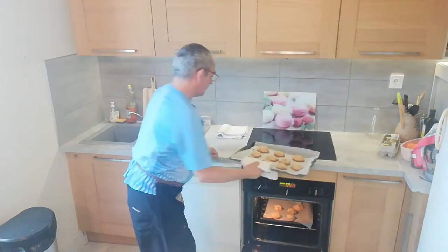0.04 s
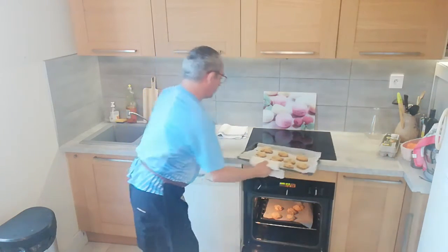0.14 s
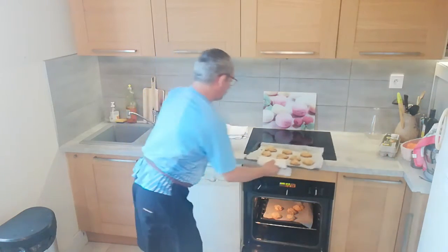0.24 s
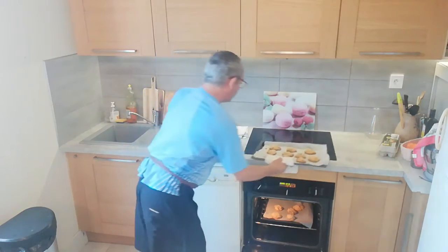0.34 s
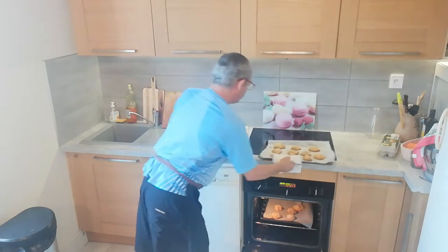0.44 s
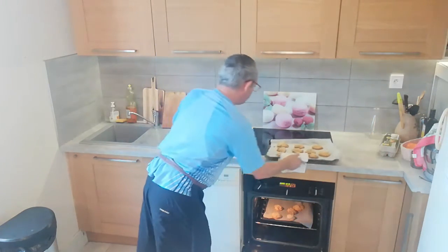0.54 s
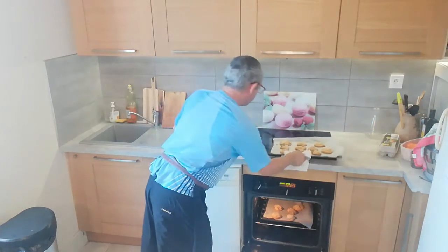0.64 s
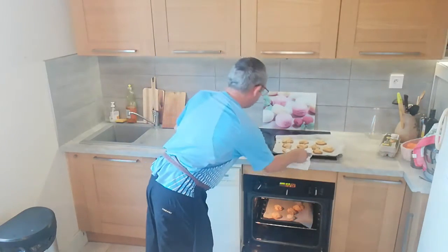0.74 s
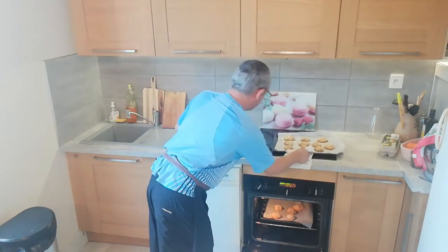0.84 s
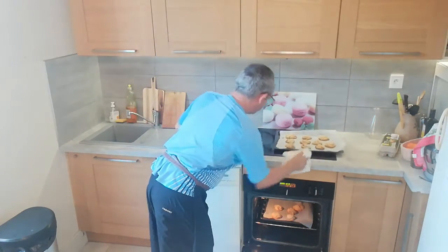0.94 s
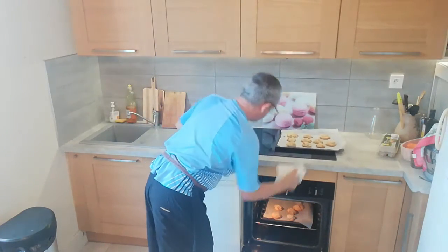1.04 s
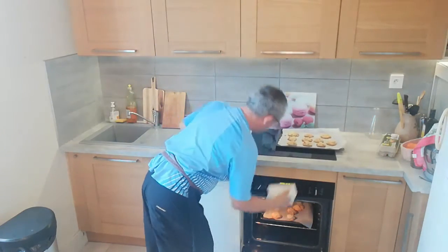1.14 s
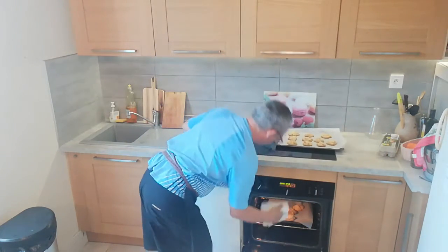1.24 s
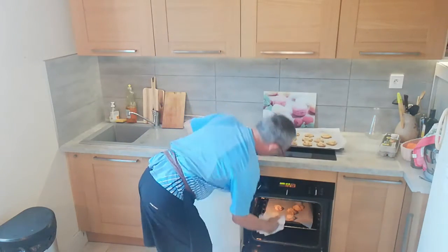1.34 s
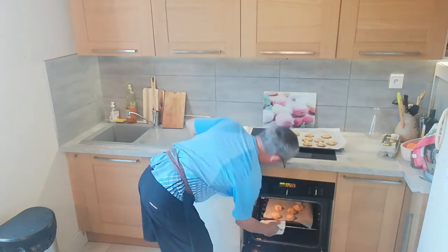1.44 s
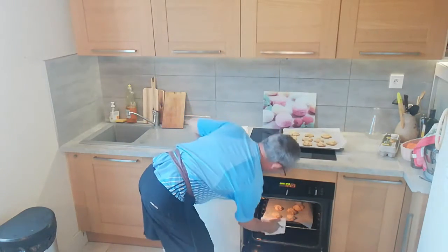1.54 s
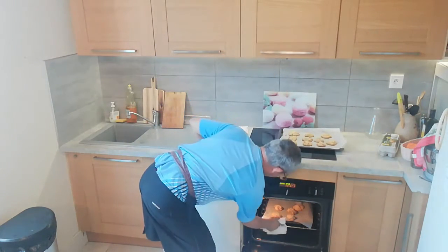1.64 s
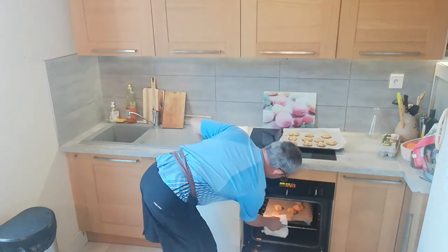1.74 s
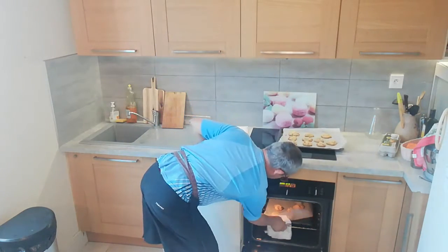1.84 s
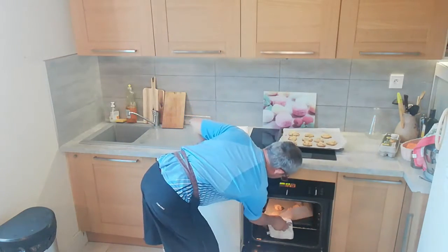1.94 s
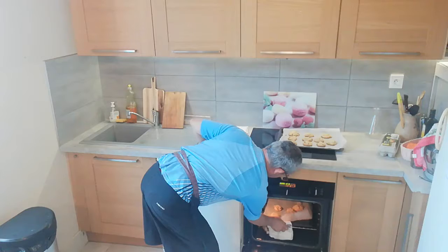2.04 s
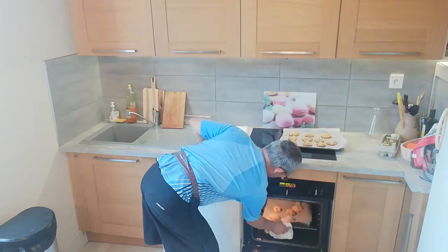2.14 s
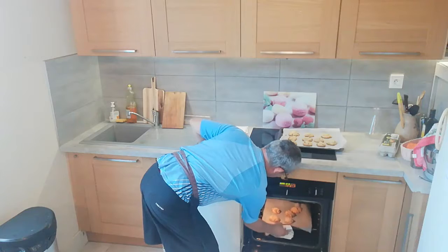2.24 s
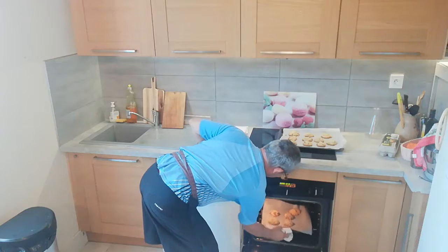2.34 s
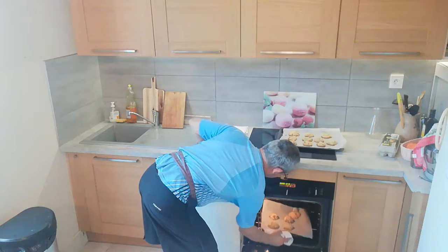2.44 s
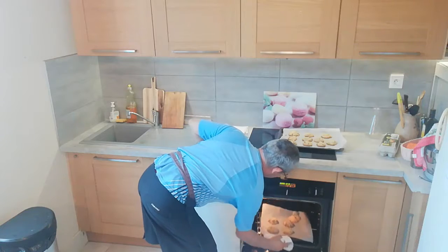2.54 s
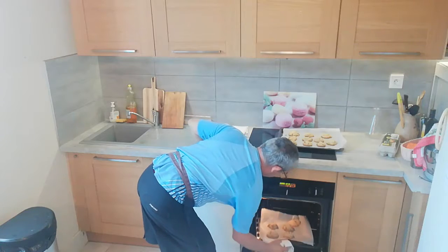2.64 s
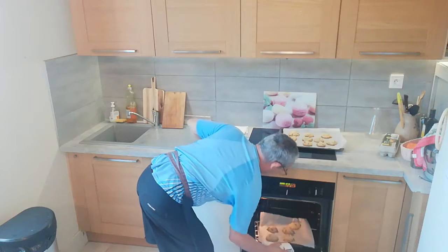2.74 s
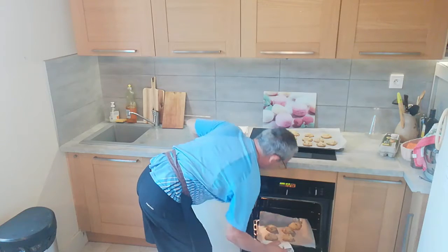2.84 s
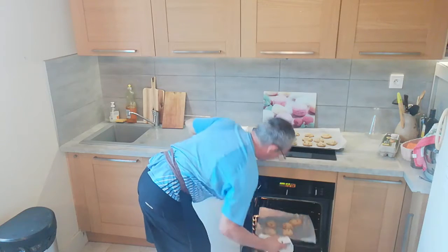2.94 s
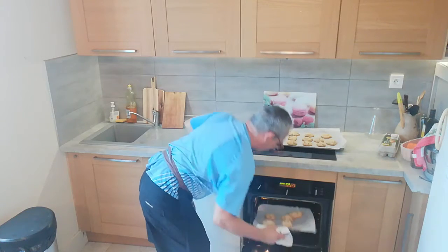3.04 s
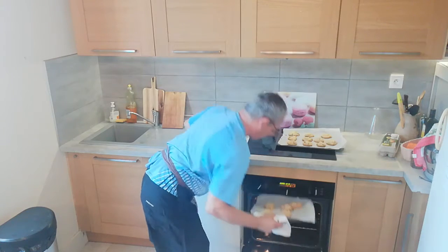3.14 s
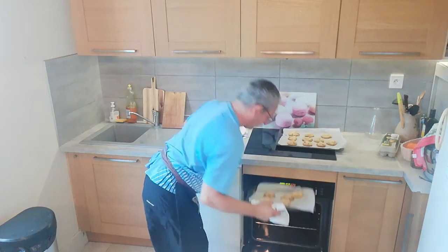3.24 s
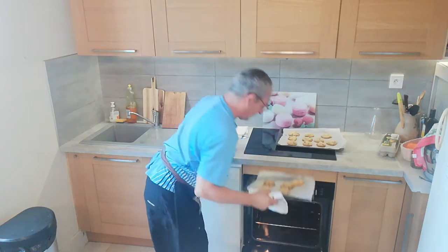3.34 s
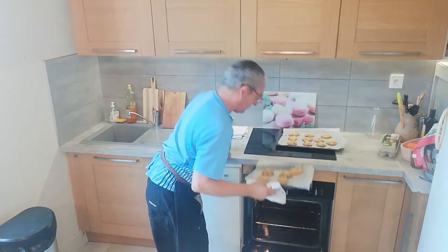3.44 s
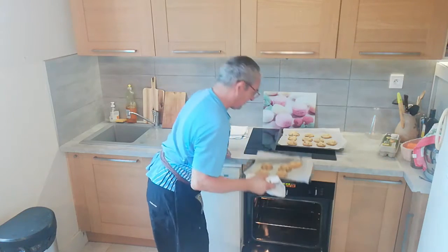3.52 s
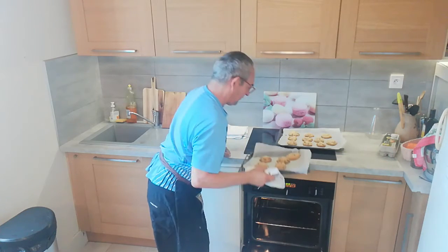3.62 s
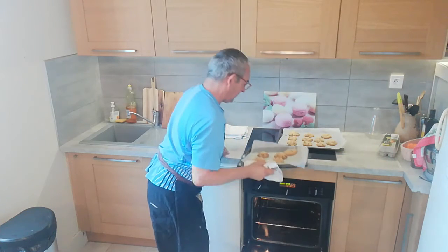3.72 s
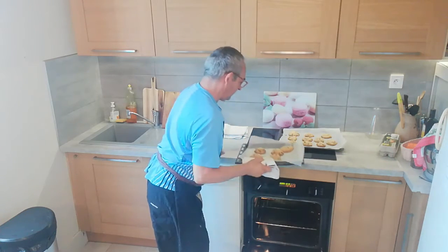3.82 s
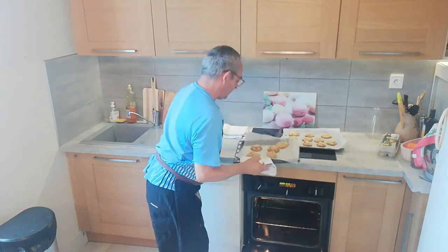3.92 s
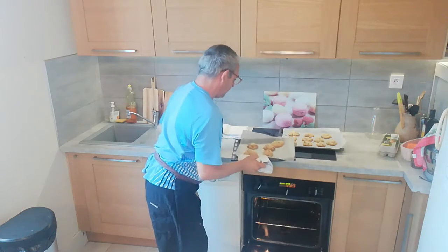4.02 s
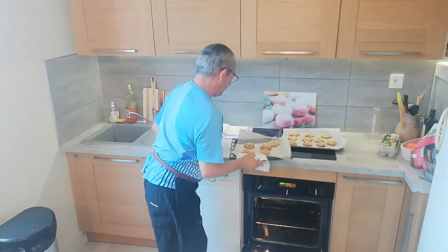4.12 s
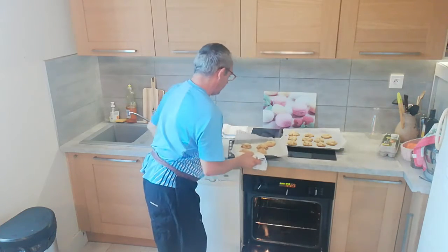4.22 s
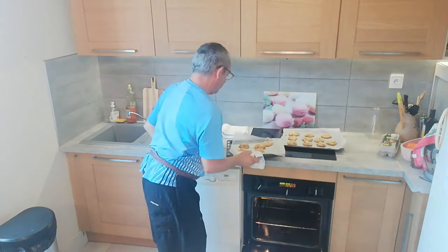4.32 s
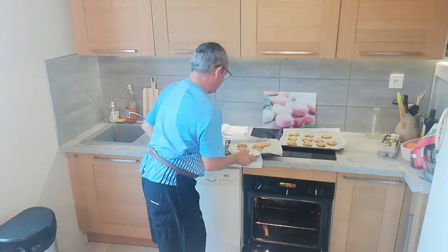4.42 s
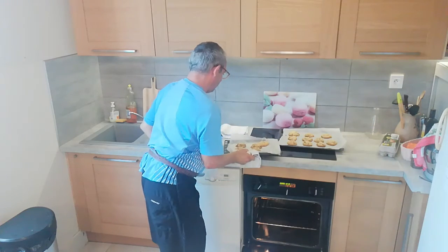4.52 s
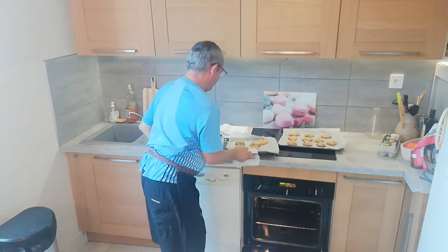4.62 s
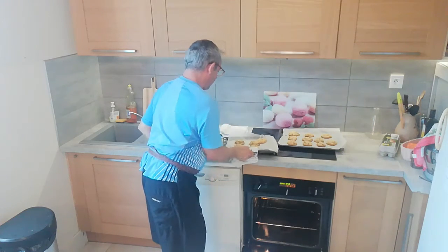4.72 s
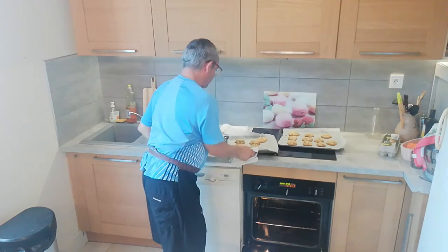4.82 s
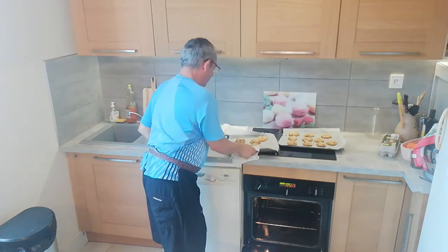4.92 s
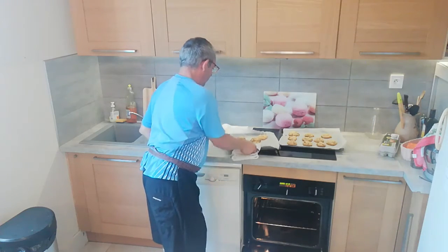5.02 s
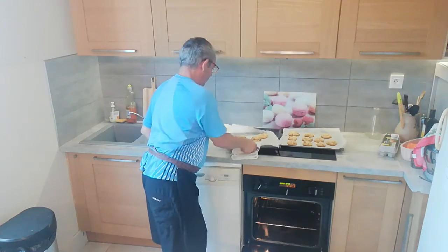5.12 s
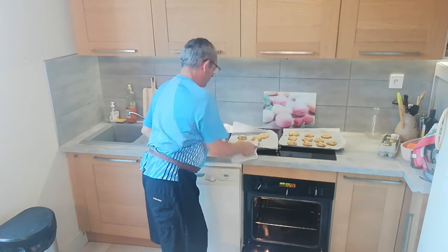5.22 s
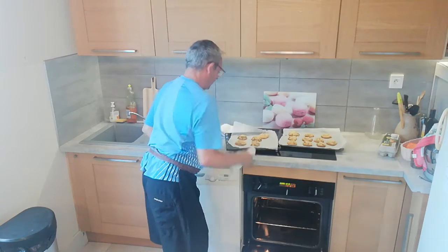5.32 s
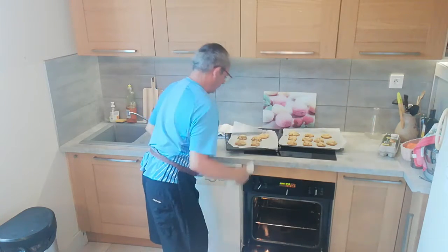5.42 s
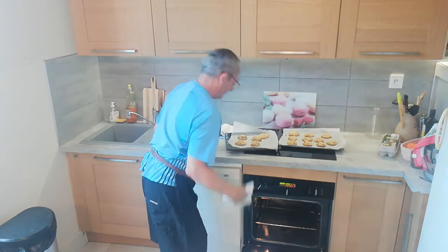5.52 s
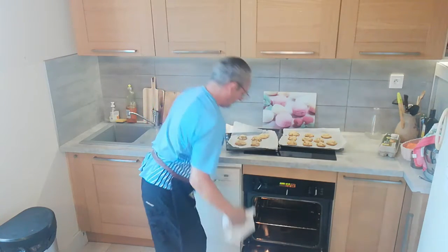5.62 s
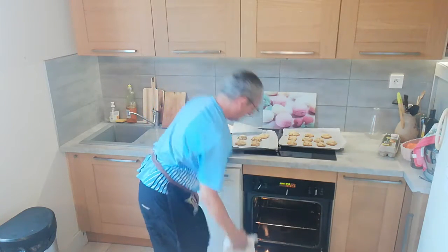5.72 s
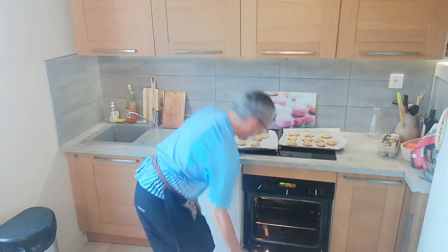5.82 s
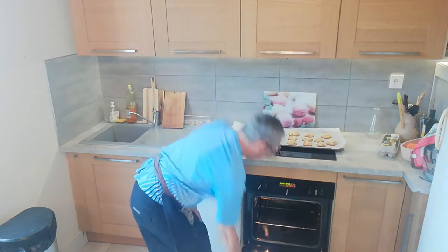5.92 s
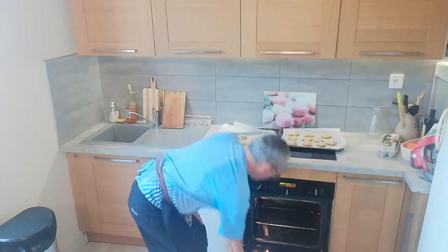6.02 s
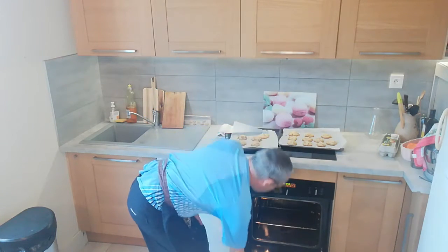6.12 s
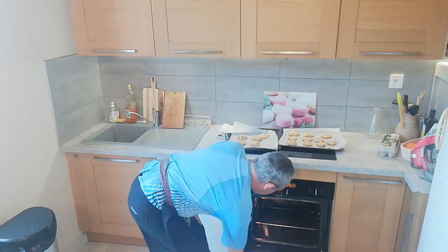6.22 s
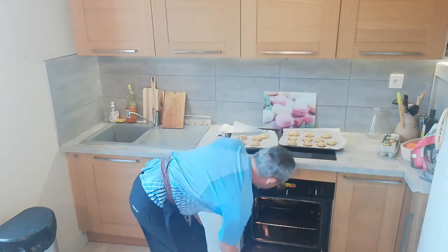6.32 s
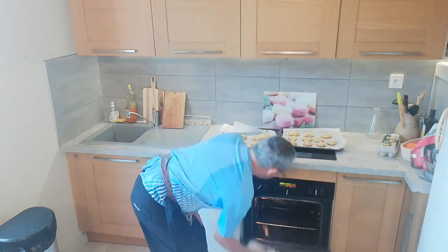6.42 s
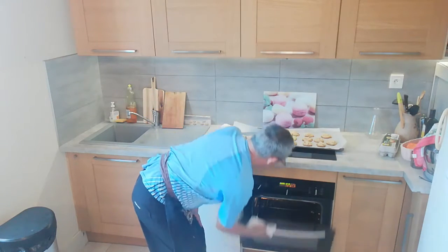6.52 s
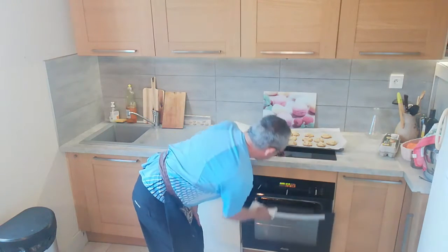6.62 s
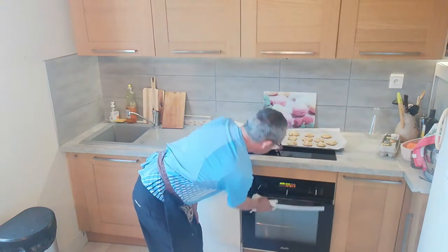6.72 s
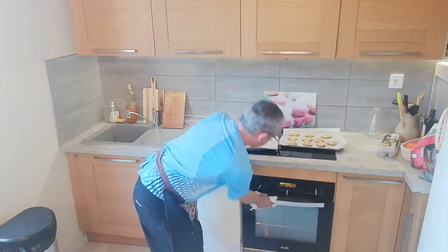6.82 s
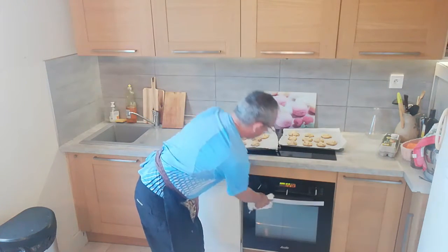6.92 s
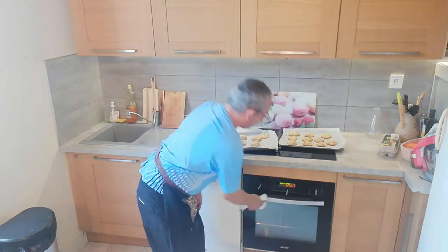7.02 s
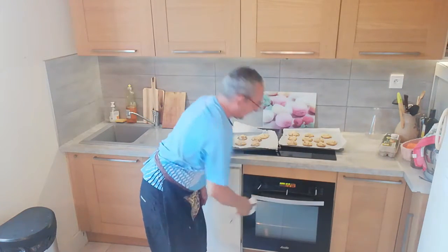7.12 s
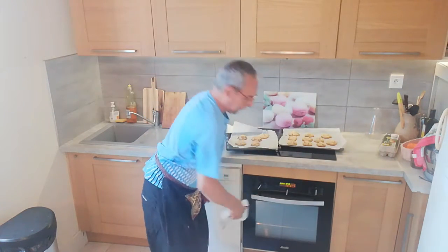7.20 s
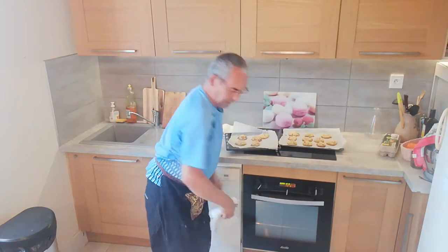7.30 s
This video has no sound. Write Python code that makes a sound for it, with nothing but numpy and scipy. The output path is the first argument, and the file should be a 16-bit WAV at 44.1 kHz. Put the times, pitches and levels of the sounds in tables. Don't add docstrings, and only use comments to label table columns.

```python
import sys
import numpy as np
from scipy import signal
from scipy.fft import rfft, irfft, next_fast_len
from scipy.io import wavfile

SR = 44100
rng = np.random.default_rng(int(sys.argv[2]) if len(sys.argv) > 2 else 0)


def natural_amplitude(level_db):
    exponent = np.asarray(level_db, float) / 20
    return 10 ** exponent


def digitize_waveform(pressure):
    field = np.atleast_2d(pressure).T
    bounded = np.clip(field, -1, 1)
    quanta = np.round(bounded * 32767).astype(np.int16)
    wavfile.write(sys.argv[1], SR, quanta)


N = 324576


def at_hz(points, hz):
    table_hz, value = np.transpose(points)
    return np.interp(np.log(hz + 1), np.log(table_hz + 1), value)


def rms_one(x):
    return x / np.sqrt(np.mean(x ** 2) + 1e-20)


def coloured(x, spectrum):
    hz = np.arange(x.shape[-1] // 2 + 1) * SR / x.shape[-1]
    return rms_one(irfft(rfft(x) * natural_amplitude(at_hz(spectrum, hz)), x.shape[-1]))


def diffuse(size, likeness):
    hz = np.arange(size // 2 + 1) * SR / size
    mid, side = rfft(rng.standard_normal((2, size)))
    alike = np.clip(at_hz(likeness, hz), -1, 1)
    left_right = np.sqrt(1 + alike) * mid + np.sqrt(1 - alike) * side * [[1], [-1]]
    return hz, left_right / np.sqrt(2)


def drift(rate_hz):
    steps = rng.standard_normal(2000)
    return np.interp(np.arange(N) / SR * rate_hz, np.arange(2000), steps) * 1.22


def resonator(hz, radius):
    return [1, -2 * radius * np.cos(2 * np.pi * hz / SR), radius * radius]


def ring(x, hz, t60):
    return signal.lfilter([0, np.sin(2 * np.pi * hz / SR)], resonator(hz, natural_amplitude(-60 / (t60 * SR))), x + 1e-18)


def struck(x, modes):
    return sum((-1) ** k * natural_amplitude(db) * ring(x, hz, t60) for k, (hz, db, t60) in enumerate(modes))


def band(x, low_hz, high_hz):
    return signal.sosfilt(signal.butter(2, [low_hz, high_hz], "band", fs=SR, output="sos"), x + 1e-18)


def stroke(rows):
    s, *columns = np.transpose(rows)
    at = np.arange(int(s[0] * SR), min(int(s[-1] * SR), N))
    since_start = at - at[0] + SR * (at[0] == 0)
    until_end = at[-1] - at + SR * (at[-1] > N - 9)
    fade = np.clip(np.minimum(since_start, until_end) / (0.017 * SR), 0, 1) ** 2
    return at, fade, [np.interp(at / SR, s, c) for c in columns]


# frequency in Hz, density in dB per Hz.
FAN_AIR = [(12, -48), (20, -7.5), (53, -7.5), (70, -11), (101, -5), (163, -14.5), (198, -6), (319, -13),
           (434, -14), (499, -15.5), (739, -11.5), (874, -9), (950, -12), (2530, -18), (16000, -35)]
# frequency in Hz, width in Hz, level in dB.
FAN_HUM = [(42.8, 6.8, -75.5), (94, 2.8, -79.5), (194.2, 72, -85.5), (892, 22, -77), (1102, 31, -97.5),
           (1250, 25, -94.5)]
# frequency in Hz, left-right difference in dB.
FAN_BALANCE = [(60, -1.5), (150, 1), (380, 0.5), (950, -3), (2380, -0.5), (5980, -4.5), (15000, 2.5)]
# frequency in Hz, left-right likeness from -1 to 1.
FAN_LIKENESS = [(60, 1), (110, 0.9), (200, 0.95), (380, -0.12), (700, -0.68), (1290, 0.36), (2380, -0.29),
                (4400, 0.59), (8120, 0.19), (15000, -0.43)]


def fan():
    hz, noise = diffuse(N, FAN_LIKENESS)
    colour_db = at_hz(FAN_AIR, hz) + at_hz(FAN_BALANCE, hz) * [[.5], [-.5]]
    air = natural_amplitude(-66.5) * rms_one(irfft(noise * natural_amplitude(colour_db), N))
    hums = 0
    for centre, width, db in FAN_HUM:
        peak = natural_amplitude(db) / np.sqrt(width / SR * np.pi / 2)
        hums = hums + peak / (1 + ((hz - centre) / width * 2) ** 2)
    return air * natural_amplitude(.5 * drift(2.7)) + natural_amplitude(.6 * drift(4.4)) * irfft(noise * hums, N)


# start in seconds, end in seconds, first rasp in dB,
# last rasp in dB, low drag against the rasp in dB.
DRAGS = [(0.674, 0.844, -69, -48, 5.5), (0.81, 0.935, -55, -45.5, 11), (0.928, 1.122, -46, -55, -21),
         (1.727, 1.88, -51.5, -53.5, -9), (1.84, 2.12, -50, -39.5, -4.5), (2.46, 2.622, -58, -50.5, -9),
         (4.586, 4.862, -47, -54, 5.5), (4.845, 5.016, -50, -61, 4.5), (5.158, 5.273, -49, -52, -1.5),
         (5.593, 5.79, -66, -75, -10), (6.56, 6.663, -74, -65, 5), (7.196, 7.366, -67.5, -55, -4.5)]
# peak time in seconds, peak rasp in dB, swell in seconds, fade in seconds,
# low drag against the rasp in dB.
SCUFFS = [(0.005, -52.5, 0.015, 0.37, -5.5), (0.115, -56.5, 0.024, 0.043, 1),
          (2.294, -49.5, 0.26, 0.37, -5), (2.68, -65.5, .03, 0.068, 13.5), (2.934, -70.5, .14, 0.13, 1),
          (3.164, -41, 0.18, 0.17, -5.5), (3.641, -50.5, 0.074, 0.23, -6.5),
          (4.171, -60.5, 0.017, 0.1, -14.5), (4.278, -61.5, 0.013, .1, -13.5), (4.534, -41, 0.019, 0.14, 9),
          (5.096, -41.5, 0.11, 0.57, -12), (5.944, -42, 0.17, 0.15, -12.5), (6.54, -50, 0.1, 0.078, -15),
          (6.685, -41.5, 0.034, 0.15, -6)]


def movements():
    drag_grit, scuff_grit = 0.19, 0.38
    swell_db, fade_db = 26.5, 46.5
    shoulder = 0.34
    moves = []
    for start, end, first, last, drag in DRAGS:
        moves.append([(start, first, drag, drag_grit), (end, last, drag, drag_grit)])
    for s, db, swell, fade, drag in SCUFFS:
        points = [(max(s - swell, 0), db - swell_db), (max(s - swell / 2, 0), db - shoulder * swell_db),
                  (s, db), (s + fade, db - fade_db)]
        moves.append([(when, level, drag, scuff_grit) for when, level in points])
    return moves


# frequency in Hz, density in dB per Hz.
RASP = [(1180, -35.5), (2000, -15.5), (3430, -6.5), (4190, -3.5), (4740, -3), (6710, -6.5), (7990, -9),
        (10800, -22.5), (14200, -25.5), (16000, -32)]
# frequency in Hz, density in dB per Hz.
LOW_DRAG = [(300, -1.5), (800, 1.5), (1500, 7), (2500, -1.5), (3600, 1), (5000, -66.5)]


def slides():
    grain_size = natural_amplitude(1.75 * np.minimum(rng.exponential(1, N), 5))
    grains = (rng.random(N) < 2500 / SR) * grain_size * rng.choice([-1, 1], N)
    smooth, out = rng.standard_normal(N), np.zeros(N)
    rasp, drag = ([coloured(x, shape) for x in (smooth, grains)] for shape in (RASP, LOW_DRAG))
    uneven = natural_amplitude(3.37 * drift(60))
    for rows in movements():
        at, fade, (rasp_db, drag_db, grit) = stroke(rows)
        high, low = [np.sqrt(1 - grit) * a[at] + np.sqrt(grit) * b[at] for a, b in (rasp, drag)]
        out[at] += fade * uneven[at] * natural_amplitude(rasp_db - 4.0) * (high + natural_amplitude(drag_db - 4.5) * low)
    return out


# time in seconds, clang in dB, flat pan against it in dB,
# favoured mode in Hz.
LANDINGS = [(0.2203, -8.5, -9.5, 1560), (0.2444, -21.5, 0.5, 2770), (0.3417, -16.5, -1.5, 1690),
            (0.4286, -25, -47, 1540), (0.837, -20, -5, 1220), (0.8809, -34, -26, 1440),
            (4.6002, -29.5, -2.5, 1540), (4.6986, -36, -6, 2900), (4.8778, -36, -7, 1410),
            (5.2627, -13.5, -2, 3420), (5.3098, -20.5, -22, 3420), (7.0081, -34, -16, 1260)]
# time in seconds, clang in dB, flat pan against it in dB, favoured mode in Hz.
CATCHES = [
    (0.4983, -39.5, -19.5, 1240),
    (1.7424, -44.5, -11.5, 3810),
    (1.8577, -41, -10.5, 3560),
    (2.0598, -36.5, -26, 3660),
    (2.0855, -38, -5.5, 3500),
    (4.5151, -30, -9, 2870),
    (5.0824, -43, -6, 4800),
    (6.659, -35, -4, 4130),
    (6.9466, -50.5, -8, 6500),
]
# time in seconds, clang in dB, flat pan against it in dB,
# favoured mode in Hz.
TAPS = [
    (3.142, -47, -14, 3380),
    (3.1899, -61, 1, 2970),
    (3.611, -47, -7.5, 4800),
    (3.6333, -46, -7, 3060),
    (4.1649, -58, -2, 3270),
    (4.2722, -61, -18, 4340),
    (5.9312, -35.5, -18, 2300),
]
# time in seconds, clang in dB, flat pan against it in dB, favoured mode in Hz.
BUMPS = [
    (2.414, -37, -0.5, 1170),
    (2.44, -41, 4, 1320),
    (2.5948, -49, -32, 3300),
    (5.1784, -56.5, 1.5, 5200),
    (6.664, -41, -0.5, 1130),
    (6.981, -35.5, 3.5, 1140),
]


def knocks():
    # edge brightness and belly, in dB against the clang.
    kinds = (LANDINGS, -18, -16), (CATCHES, 8.5, -29), (TAPS, -22, -33.5), (BUMPS, 2, -0.5)
    return sorted((s, db, edge, pan, belly, hz) for rows, edge, belly in kinds for s, db, pan, hz in rows)


def contacts(db, rise_s, last_s):
    out, t = np.zeros((2, N + 2205)), np.arange(2205) / SR
    envelope = (1 - np.exp(-t / rise_s)) * np.exp(-t / last_s)
    touch = rng.standard_normal((len(knocks()), 2205)) * envelope
    for row, gain, burst in zip(knocks(), natural_amplitude(db), touch):
        at = int(row[0] * SR)
        out[0, at:at + 2205] += gain * burst / np.sqrt(np.sum(burst ** 2))
        out[1, at + int(rise_s * SR)] += gain
    return out[:, :N]


def spot(row, contact):
    out, at = np.zeros_like(contact), int(row[0] * SR)
    blow = contact[:, at:at + 4410] * (np.arange(4410) < 900)
    out[:, at:at + 4410] = ring(blow, row[5], .018)
    return out * natural_amplitude(np.array([[0], [-9]]))


# frequency in Hz, width in Hz, lift in dB (negative
TRAY = [(534, 250, -3.5), (726, 81, 4.5), (1230, 270, -0.5), (1690, 27, 3), (2945, 450, 3.5),
        (3500, 560, -1.5), (4870, 280, 4), (6840, 920, 3.5)]


def trays():
    _, clang, edge, pan, belly, _ = np.transpose(knocks())
    hit = contacts(clang, .002, 0.0071)
    sheet = natural_amplitude(37.5) * band(hit, 1900, 4134) + natural_amplitude(11.5) * sum(spot(row, hit) for row in knocks())
    sheet += natural_amplitude(41.5) * band(contacts(clang + pan, .002, 0.012), 713, 2000)
    sheet += natural_amplitude(51.5) * band(contacts(clang + belly, 0.0018, 0.0058), 150, 676)
    sheet += natural_amplitude(26.5) * band(contacts(clang + edge, .001, 0.014), 4200, 8400)
    for hz, width, db in TRAY:
        radius = np.exp(-np.pi * width / SR)
        feed = np.array([1, 0, -1]) * (1 - radius * radius) / 2
        peak = signal.lfilter(feed, resonator(hz, radius), sheet + 1e-18)
        sheet = sheet + (natural_amplitude(db) - 1) * peak
    return sheet


# frequency in Hz, level against the clang in dB, t60 in seconds.
SHEET = [(757, -14.5, .25), (1240, -11, 0.18), (1425, -21.5, .3), (1670, -24.5, 0.28), (1854, -23, 0.44),
         (2560, -24, .3), (2860, -21, 0.26), (2973, -23, .35), (3250, -20, .35), (3420, -23, .3),
         (3710, -20.5, 0.55), (3803, -20.5, .35), (4230, -24.5, .25), (4576, -23.5, .2)]


def chime():
    reach_db_per_octave = 13
    s, db, _, own_hz = np.transpose(LANDINGS + CATCHES)
    out = np.zeros(N)
    for hz, mode_db, t60 in SHEET:
        clicks = np.zeros(N)
        octaves_away = abs(np.log2(hz / own_hz))
        clicks[((s + .003) * SR).astype(int)] = natural_amplitude(db + mode_db - reach_db_per_octave * octaves_away)
        out += ring(clicks, hz, t60)
    return out


# time in seconds, peak in dB, panel mode in Hz, room boom against it in dB.
HOB = [
    (0.224, -32, 128, -6),
    (0.298, -24.5, 277, -19),
    (0.346, -32, 267, -7.5),
    (0.458, -33, 223, -18),
    (0.517, -43.5, 146.5, -18),
    (0.842, -30, 180, -15.5),
]
# time in seconds, peak in dB, panel mode in Hz, boom against it in dB.
SHELF = [(1.898, -56, 234, -11), (2.13, -48.5, 140.7, -18), (2.299, -50, 189, -6),
         (2.417, -29.5, 137.7, -30), (2.433, -22, 142.1, -40), (2.425, -27, 182.2, -30),
         (2.594, -42.5, 161.7, -25), (2.22, -48.5, 227, -9), (2.419, -46, 464, -28), (2.42, -44, 700, -27),
         (2.59, -56, 595, -20)]
# time in seconds, peak in dB, panel mode in Hz, boom against it in dB.
WORKTOP = [(4.518, -42, 204, -16), (4.595, -28.5, 274.7, -23), (4.603, -34.5, 129, -24),
           (4.657, -26.5, 264.3, -28.5), (4.786, -44.5, 172, -7.5), (4.877, -39, 123, -17),
           (4.885, -28, 322, -22), (4.94, -43, 250, -14), (5.16, -41, 302, -14),
           (5.266, -23.5, 137.7, -27.5), (5.27, -45, 448, -22), (5.298, -27, 144.6, -7.5)]
# time in seconds, peak in dB, panel mode in Hz.
PANEL = [(6.44, -58.5, 101), (6.499, -63, 91.5), (6.568, -54.5, 100), (6.668, -36.5, 94),
         (6.721, -45, 101.7), (6.789, -47.5, 70), (6.665, -41, 254), (6.978, -36, 83.4), (6.992, -32, 199),
         (7.017, -29.5, 95.7), (7.049, -34.5, 241.5), (7.088, -39.5, 110.3), (7.148, -46, 100)]


def thuds():
    door_rows = [(s, db, hz, -12.5) for s, db, hz in PANEL]
    bodies = (HOB, 0.25), (SHELF, 0.49), (WORKTOP, 0.33), (door_rows, 0.32)
    return [(s, db, hz, t60, boom_db) for rows, t60 in bodies for s, db, hz, boom_db in rows]


def push(last_s):
    t = np.arange(SR // 2) / SR
    return -t * np.exp(-np.minimum(t / last_s, 30)) / last_s ** 2 / SR


# frequency in Hz, level in dB, t60 in seconds.
BOOM = [(35, -8, 0.41), (44.4, -9, 0.83), (59.7, 5, 0.65)]


def thumps():
    out, blow = np.zeros(N + SR), push(0.0014)
    boom = struck(push(0.0061), BOOM)
    for s, db, hz, t60, boom_db in thuds():
        panel = ring(blow, hz, t60)
        panel += natural_amplitude(-2.0) * ring(blow, hz * 1.32, t60 * 1.07) + natural_amplitude(-10.5) * ring(blow, hz * 0.79, t60)
        thump = natural_amplitude(db) * band(panel, 80, 500)
        if s < DOOR[0]:
            thump += natural_amplitude(db + boom_db + 3.5) * boom
        out[int(s * SR):int(s * SR) + SR // 2] += thump
    return out[:N]


# start in seconds, end in seconds, first pitch in Hz, first level in dB,
# last level in dB.
SWINGS = [
    (6.65, 6.758, 7020, -49, -80),
    (6.75, 6.933, 7080, -58, -72),
    (7.148, 7.344, 7000, -71, -73),
]


def swings():
    sag_hz_per_s = 750
    return [[(start, hz, first), (end, hz - sag_hz_per_s * (end - start), last)]
            for start, end, hz, first, last in SWINGS]


# start in seconds, end in seconds, level in dB.
SQUEAK = [
    (6.51, 6.562, -49),
    (6.57, 6.589, -56),
    (6.593, 6.658, -62),
]
SQUEAK_OVERTONES_DB = [9.5, -9, -23]


def hinge():
    squeak_hz = 4485
    out, flutter = np.zeros(N), natural_amplitude(3.0 * drift(70))
    for start, end, db in SQUEAK:
        t = np.arange(int((end - start) * SR)) / SR
        at = int(start * SR) + np.arange(len(t))
        swell = np.sin(np.pi * (t / t[-1]) ** 2.0) ** .5
        tone = sum(natural_amplitude(overtone_db) * np.sin(2 * np.pi * (k + 1) * squeak_hz * t)
                   for k, overtone_db in enumerate(SQUEAK_OVERTONES_DB))
        out[at] += natural_amplitude(db + 0.5) * swell * tone * flutter[at] ** .5
    for rows in swings():
        at, fade, (hz, db) = stroke(rows)
        out[at] += fade * flutter[at] * natural_amplitude(db + 2.0) * np.sin(2 * np.pi * np.cumsum(hz) / SR)
    return out


# time in seconds, room mode in Hz, t60 in seconds, peak in dB.
DOOR = (6.963, 44.5, 0.54, -28.5)


def door():
    s, hz, t60, db = DOOR
    swell = ring(ring(push(0.003), hz, t60), hz * 1.125, t60)
    out = np.zeros(N + SR)
    out[int(s * SR):int(s * SR) + SR // 2] = natural_amplitude(db) * swell / abs(swell).max()
    return out[:N]


# frequency in Hz, t60 in seconds.
ROOM_T60 = [(250, 0.5), (700, 0.4), (1500, 0.54), (3000, 0.46), (6000, 0.46), (12000, 0.44)]
# frequency in Hz, left-right difference in dB.
SHADOW = [(60, 0.0), (110, 0.0), (200, -0.5), (380, -1.5), (700, -2.5), (1290, 0.0), (2380, -4.5),
          (4400, -9.5), (8120, -12.5), (15000, -2.0)]
# frequency in Hz, left-right likeness from -1 to 1.
TAIL_LIKENESS = [(60, 0.99), (110, -1.1), (200, 1), (380, 0.85), (700, -0.0099), (1290, 0.38), (2380, 0.11),
                 (4400, -0.17), (8120, -0.26), (15000, -1)]


def kitchen(close, spread):
    left_lag_s = 25 / 44100
    size, t = 2 ** 15, np.arange(2 ** 15) / SR
    hz, noise = diffuse(size, TAIL_LIKENESS)
    octave, tail = np.log2((hz + 1) / 177), 0
    for k in range(7):
        share = np.clip(1 - abs(octave - k), 0, 1)
        dying = natural_amplitude(-60 * t / at_hz(ROOM_T60, 177 * 2 ** k)) * (1 - np.exp(-t / 0.0056))
        tail = tail + irfft(noise * share, size) * dying / np.sqrt(np.sum(dying ** 2))
    padded = next_fast_len(N + size)
    hz = np.arange(padded // 2 + 1) * SR / padded
    direct = np.exp(-2j * np.pi * hz * [[left_lag_s], [0]])
    heard = rfft(close, padded) * direct + rfft(spread, padded) * rfft(tail, padded)
    return irfft(heard * natural_amplitude(at_hz(SHADOW, hz) * [[.7], [-.3]]), padded)[:, :N]


def scene():
    touches, impulses = trays()
    rub, squeak, low = slides(), hinge(), thumps()
    close = natural_amplitude(-13.0) * touches + natural_amplitude(-1) * rub + squeak + chime()
    spread = natural_amplitude(-6.5) * impulses + rub + natural_amplitude(-12.0) * squeak + natural_amplitude(-11) * low
    return kitchen(close, spread) + low + door() + fan()


def low_pass(x):
    return signal.sosfilt(signal.butter(12, 15780, fs=SR, output="sos"), x)


def record(dry):
    mix = signal.sosfilt(signal.cheby2(16, 60, 16500, fs=SR, output="sos"), dry)
    return low_pass(mix)


dry = scene()
out = record(dry)
digitize_waveform(out)
```